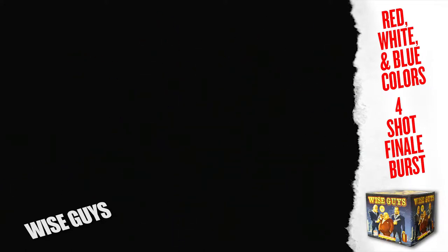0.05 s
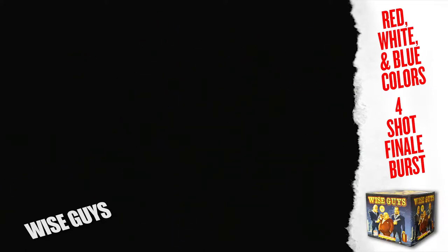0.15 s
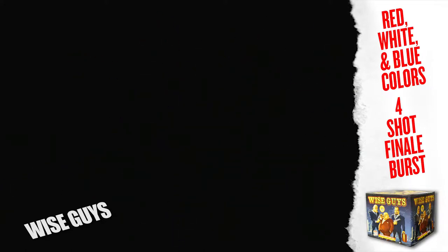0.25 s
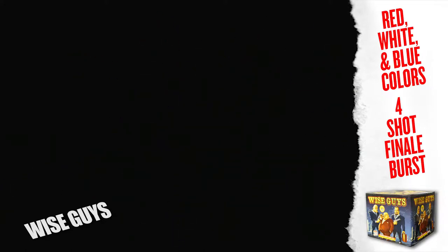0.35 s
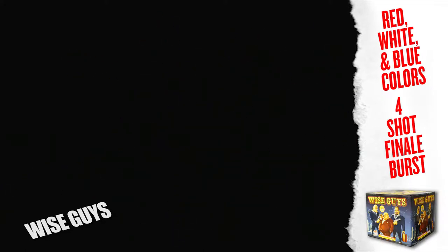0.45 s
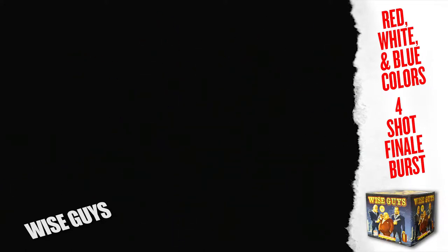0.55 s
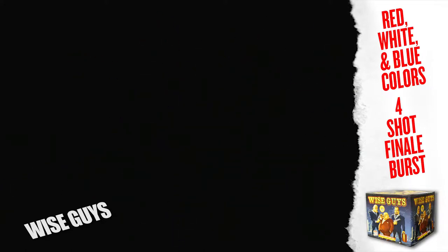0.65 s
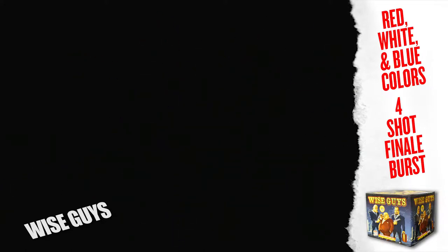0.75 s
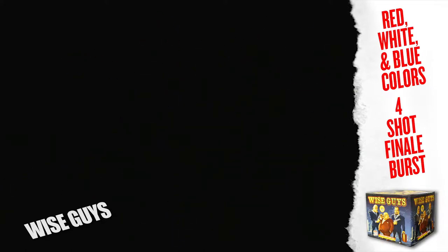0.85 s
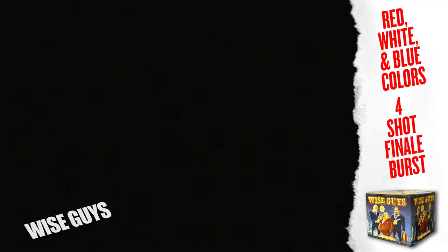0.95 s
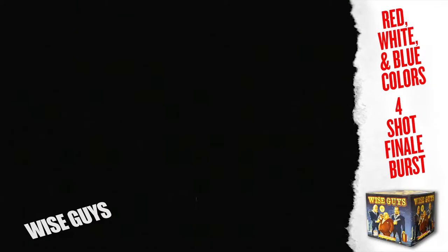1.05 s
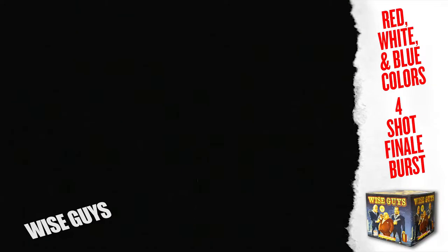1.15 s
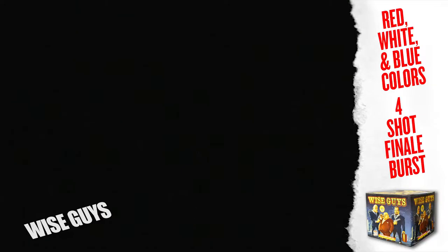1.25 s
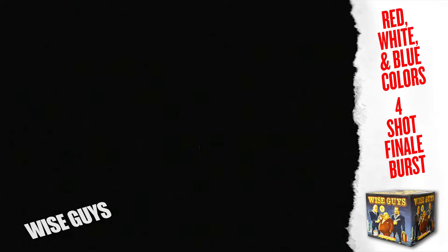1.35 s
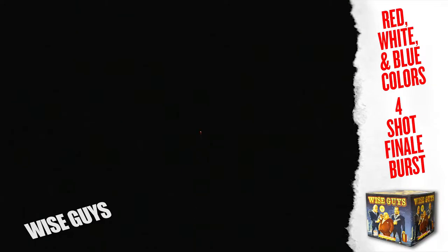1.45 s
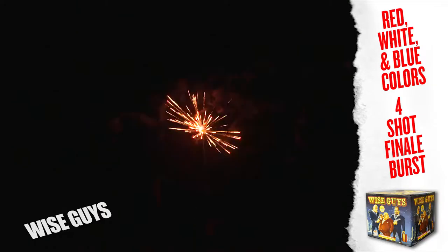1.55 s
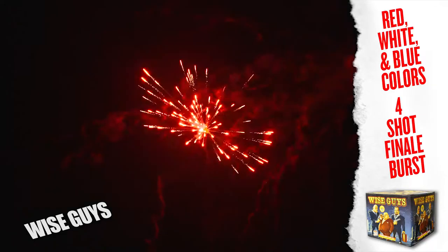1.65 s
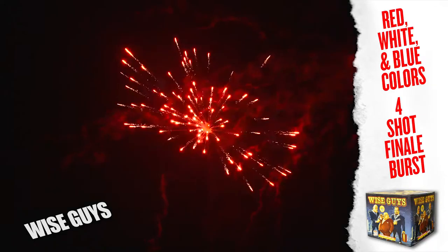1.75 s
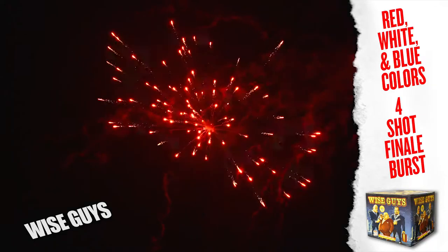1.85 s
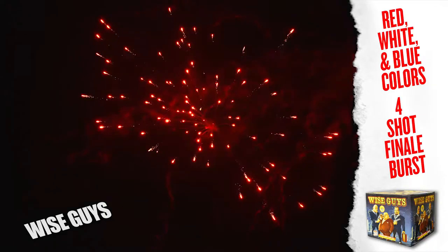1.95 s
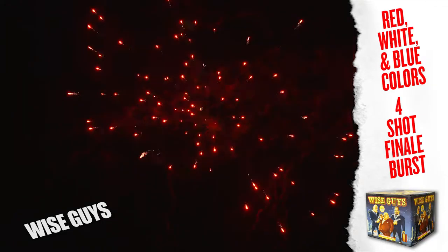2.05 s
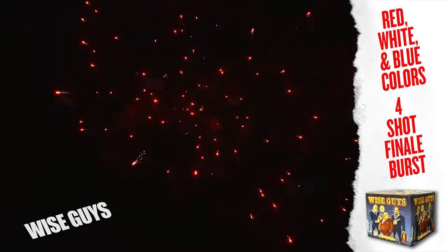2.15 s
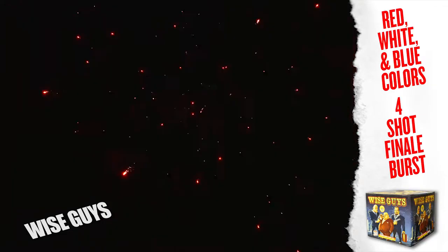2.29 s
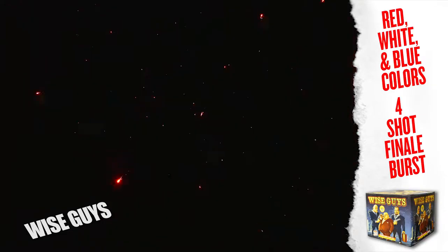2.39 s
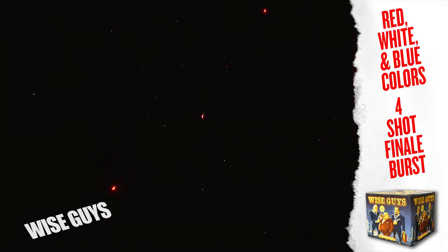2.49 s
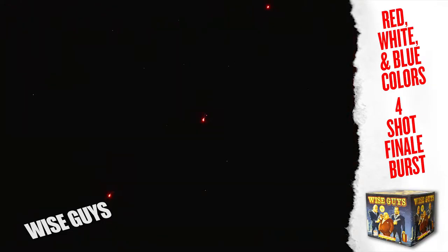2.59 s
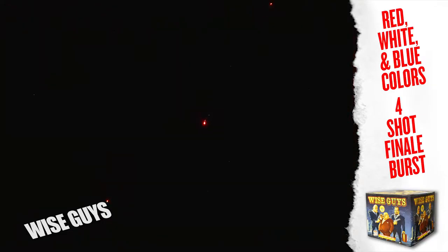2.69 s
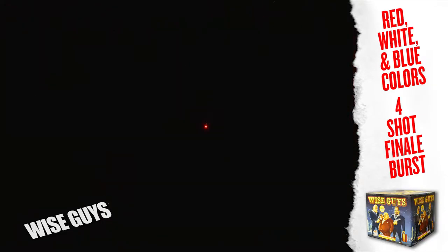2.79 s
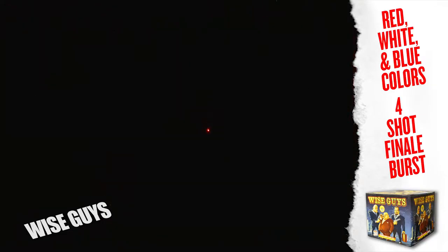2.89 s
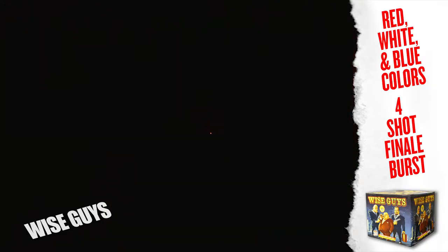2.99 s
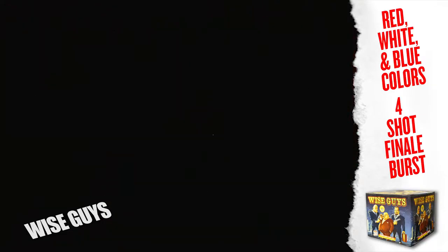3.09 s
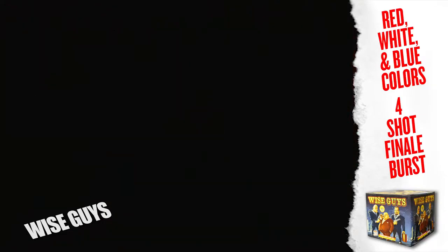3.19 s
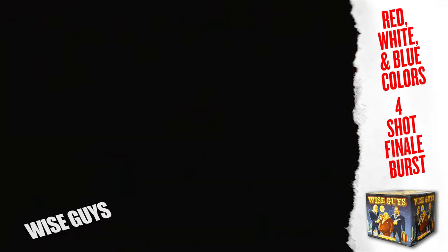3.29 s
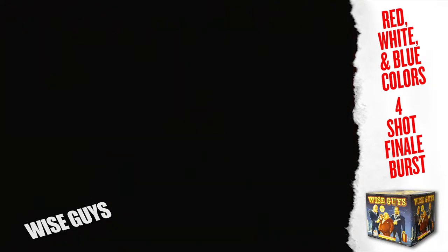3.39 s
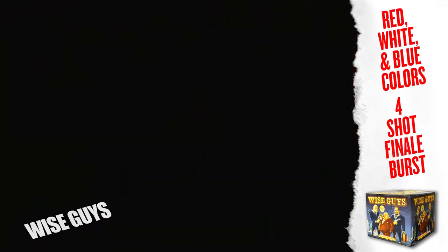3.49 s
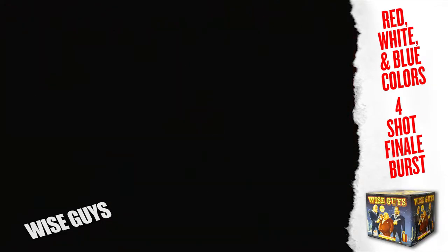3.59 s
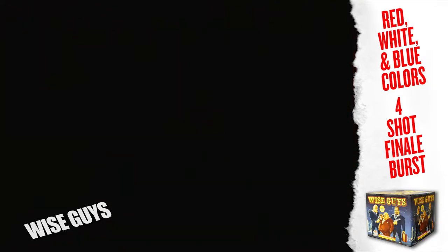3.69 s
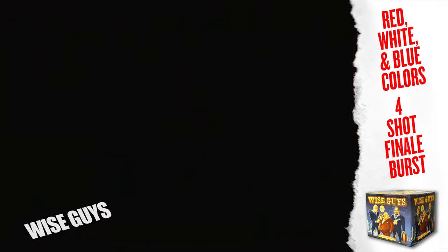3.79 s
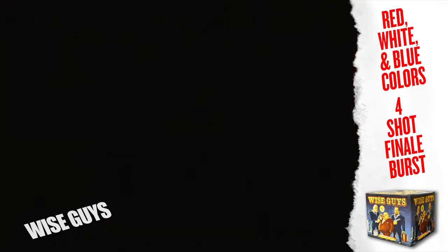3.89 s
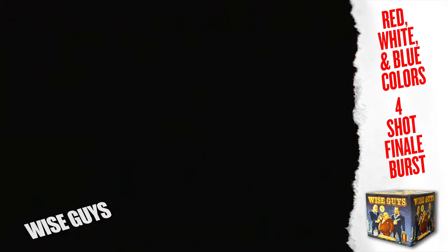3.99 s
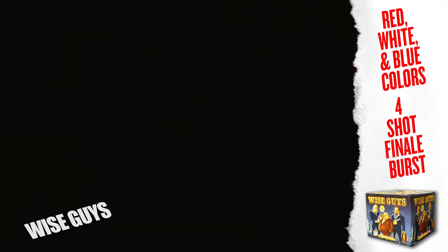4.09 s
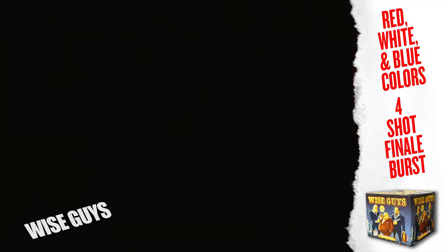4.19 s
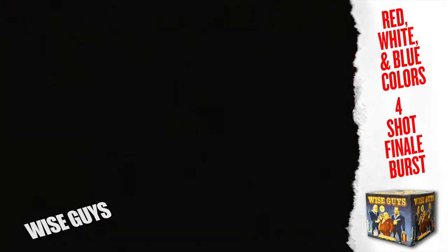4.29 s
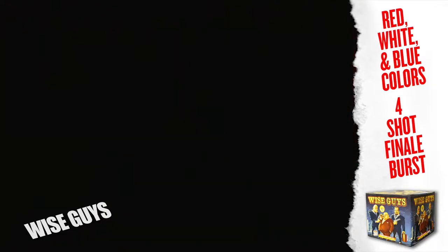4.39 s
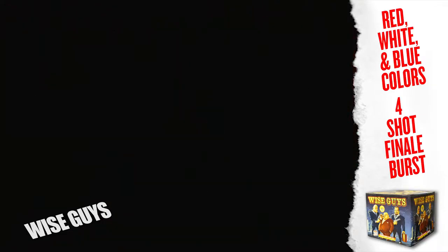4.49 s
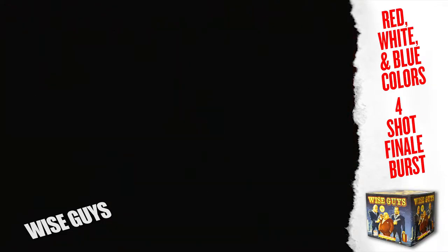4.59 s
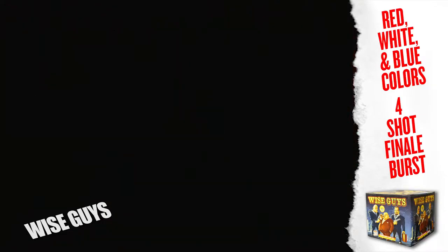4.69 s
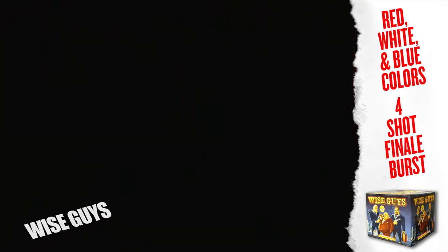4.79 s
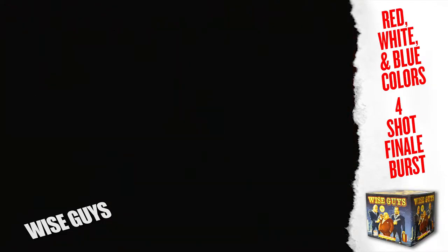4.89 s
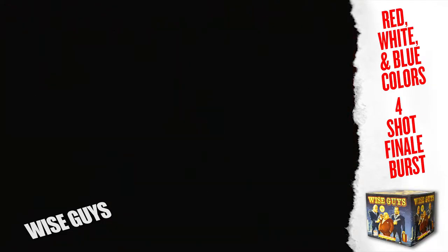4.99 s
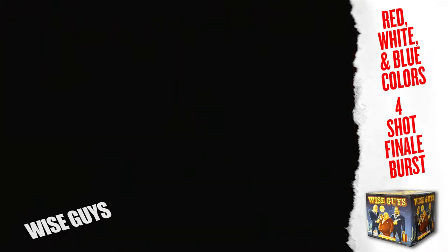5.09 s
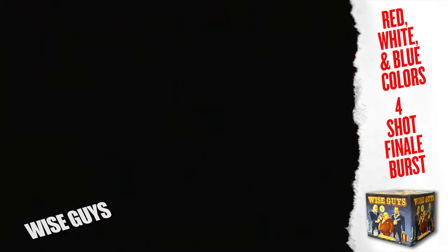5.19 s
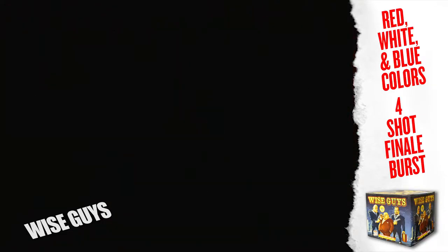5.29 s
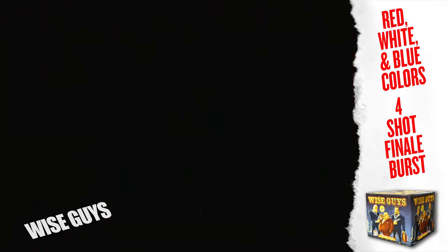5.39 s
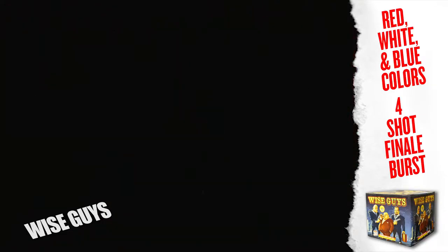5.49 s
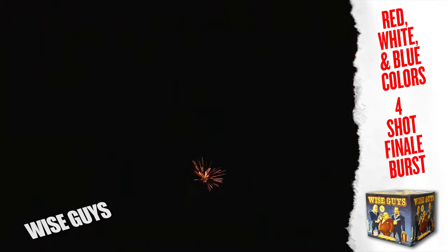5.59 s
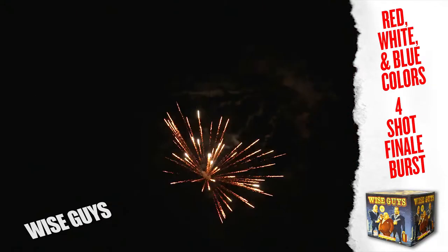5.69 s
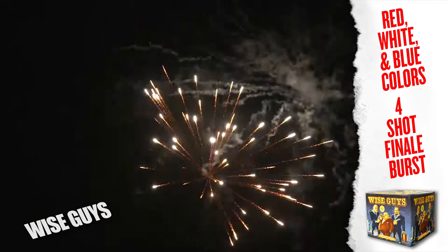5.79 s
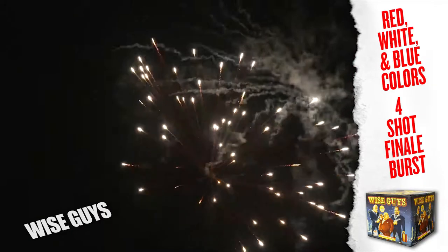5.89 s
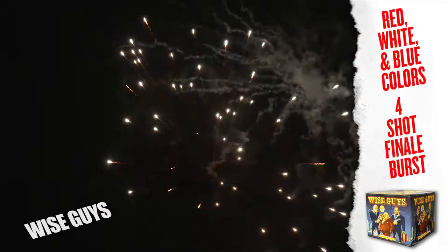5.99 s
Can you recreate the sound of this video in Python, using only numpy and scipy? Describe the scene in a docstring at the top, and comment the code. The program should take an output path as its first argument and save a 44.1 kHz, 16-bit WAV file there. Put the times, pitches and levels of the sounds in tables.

```python
"""A firework cake fires two shells at night, over a light rumble of wind. At 0.45 s the first leaves
its cardboard tube with a ringing thump and climbs on a faintly hissing fuse. At 1.8 s it bursts
overhead, hard enough to overload the microphone; nearby walls slap back, the stars fizz out and the
land rolls on for seconds. A fuse then spits its way to the second tube, which fires at 4.9 s,
and that shell bursts at 5.9 s."""
import sys
import numpy as np
from scipy import signal
from scipy.fft import rfft, irfft, next_fast_len
from scipy.io import wavfile

SR = 44100
rng = np.random.default_rng(int(sys.argv[2]) if len(sys.argv) > 2 else 0)


def pcm_store(signal):
    """Save signal as 16-bit PCM."""
    levels = np.round(np.clip(np.atleast_2d(signal), -1, 1) * 32767)
    wavfile.write(sys.argv[1], SR, levels.astype(np.int16).T)


N = 266805
T = np.arange(N) / SR


# the big hits overhead: t/s, level/dB, ground bounce lag/s, bounce gain/dB, roll gain/dB
BURSTS = [(1.8070, 5.5, 0.0049, 6, -1), (5.9035, 10.5, 0.0046, 0, 0.5)]
# hard slapback off single walls: t/s, level/dB, low-pass f/Hz
BURST_SLAPS = [(1.8147, 2.5, 805), (1.8247, 1.5, 700), (1.8261, -3, 600), (1.853, 2, 300), (1.864, -1, 450),
               (1.871, -4.5, 2210), (1.9002, -18, 3130), (1.923, -2, 179), (1.941, -1.5, 445),
               (1.964, -8.5, 800), (1.974, 2.5, 200), (2.035, 0.5, 236), (2.096, -8, 230),
               (2.739, -19.5, 454), (2.775, -22, 250), (2.961, -16, 239), (5.9098, 0.5, 607),
               (5.9193, -2.5, 500), (5.9249, -7.5, 890), (5.932, -7, 2520), (5.9596, -2.5, 1700),
               (5.9643, -1.5, 700), (5.993, -17, 1600), (6.008, -0.5, 447)]
# body of the boom rolling over the land: f/Hz, starting level/dB per octave
BURST_ROLL = [(25, -70.5), (55, -46), (85, -51.5), (150, -27.5), (300, -28), (450, -28), (720, -20.5),
              (1200, -28.5), (1750, -26.5), (2473, -30.5), (4100, -33.5), (7060, -37.5), (11000, -53),
              (16000, -73)]
# soft returns from trees and far slopes: delay/s, level/dB, smear/s, f/Hz
BURST_SCATTER = [(0, -37.5, 0.023, 5880), (.003, -31, 0.008, 2403), (.01, -16.5, 0.028, 385),
                 (0.124, -29.5, 0.033, 420), (.15, -28, 0.014, 1160), (.27, -47, .03, 1400),
                 (.035, -22.5, .012, 560), (.005, -28, .04, 88), (.74, -41, .025, 300),
                 (.92, -40, 0.014, 600), (1.12, -50, 0.016, 230)]

def bursts():
    """A shock from above and its bounce off the ground, then slaps and a long roll."""
    blast = springy_highpass(shock(push_s=0.00037), hz=134, q=2.0)
    t = T[:len(blast)]
    # the steep front overloads the microphone: a sharp double spike, a hard ring and a brief fizz
    spikes = signal.unit_impulse(len(t)) - signal.unit_impulse(len(t), int(0.00026 * SR))
    crack = undb(-17.5) * butter(spikes, 2700, "highpass")
    ring = undb(-11.5) * np.sin(2 * np.pi * 2200 * t) * np.exp(-t / 0.00036)
    mic_recovery = undb(-17.5) * np.exp(-T / 0.067) * (1 - np.exp(-T / 0.0036))
    out = np.zeros(N)
    for s, db, bounce_s, bounce_db, roll_db in BURSTS:
        for lag, path_db in [(0, 0), (bounce_s, bounce_db)]:
            fizz = undb(-18) * puff(12000, len(t)) * np.exp(-t / 0.00074)
            add(out, s + lag - 0.0002, undb(db + path_db) * crack)
            add(out, s + lag, undb(db + path_db) * (blast + ring + fizz))
        add(out, s, mic_recovery)
        land = roll(BURST_ROLL, spread_s=0.28, power=1.641, build_s=0.0025, grain=0.4,
                    loss_db_per_s=3, air_db_per_s=9.5, air_hz=3400, size=4 * SR)
        echoes = terrain(clump(land)) + scatter(BURST_SCATTER, len(land)) + fence(len(land))
        add(out, s, undb(roll_db) * echoes)
    return out + slaps(blast, BURST_SLAPS, lowest_hz=80, size=N)


# lift charge thumps: t/s, level/dB, echo gain/dB
LAUNCHES = [(0.4499, -6, -6.5), (4.8696, -6, -6)]
# dull slapback off the walls: delay/s, level/dB, low-pass f/Hz
LAUNCH_SLAPS = [(0.0125, -16, 610), (0.0213, -14.5, 690), (0.0568, -16, 500), (.101, -22, 346),
                (0.1175, -17, 350), (0.122, -22, 340), (0.17, -12.5, 380), (0.192, -21, 320)]
# the thump's tail across the land: f/Hz, starting level/dB per octave
LAUNCH_ROLL = [(30, -66.5), (71, -59.5), (129, -33), (198, -26.5), (320, -36.5), (440, -42), (720, -32.5),
               (1045, -36.5), (1600, -36), (2520, -39.5), (5000, -45.5), (8000, -55.5), (12000, -55)]
# airy returns from trees and hedges: delay/s, level/dB, smear/s, f/Hz
LAUNCH_SCATTER = [(.012, -25.5, 0.008, 2400), (.011, -36, 0.004, 5000), (.048, -39, 0.0047, 2710),
                  (.125, -35, 0.0066, 1190), (.143, -40, 0.0022, 1880), (.166, -30.5, 0.0031, 800),
                  (.186, -48.5, 0.0033, 3950)]

def launches():
    """The lift charge thumps out of the tube; both shots share one place and so one set of echoes."""
    thump = springy_highpass(shock(push_s=0.0035), hz=163, q=1.59)
    t = T[:len(thump)]
    thump = thump + 0.46 * np.pad(thump, (int(0.00042 * SR), 0))[:len(t)]  # ground bounce
    thump = butter(thump, 6000, "lowpass", order=1)
    thump = signal.lfilter(*signal.iirnotch(653, Q=3.2, fs=SR), thump)  # soft ground cancels one band
    land = roll(LAUNCH_ROLL, spread_s=0.22, power=2.037, build_s=0.006, grain=0.54,
                loss_db_per_s=6, air_db_per_s=30.5, air_hz=2250, size=3 * SR)
    walls = far_wall(len(land)) + slaps(thump, LAUNCH_SLAPS, lowest_hz=170, size=len(land))
    echoes = terrain(land) + walls + scatter(LAUNCH_SCATTER, len(land))
    echoes = butter(echoes, 8000, "lowpass", order=3)
    ignition_s = 0.0038  # the charge sounds through the tube wall just before the shell leaves
    out = np.zeros(N)
    for s, db, echo_db in LAUNCHES:
        ignition = butter(puff(2300, len(t)), 4000, "lowpass") * np.exp(-t / ignition_s)
        muzzle_crack = undb(-13) * puff(3770, len(t)) * np.exp(-t / 0.00041)
        add(out, s - ignition_s, undb(db - 38) * ignition)
        add(out, s, undb(db) * (thump + muzzle_crack + tube_ring(t) + tube_buzz(t)))
        add(out, s, undb(echo_db) * echoes)
    return out


# hollow ring, air column first and then cardboard: f/Hz, level/dB, attack/s, decay/s
TUBE_MODES = [(243, -13, 0.001, 0.023), (469, -13, 0.00011, 0.0041), (2850, -25, .0001, .0022),
              (4580, -25.5, .0001, 0.0016)]

def tube_ring(t):
    """The tube rings on after the shell has left."""
    return sum(undb(db) * np.sin(2 * np.pi * hz * t) * (1 - np.exp(-t / attack)) * np.exp(-t / decay)
               for hz, db, attack, decay in TUBE_MODES)


# cardboard rasp: f/Hz, width/Hz, level/dB
TUBE_BUZZ = [(2080, 300, -35), (2460, 230, -34), (3020, 360, -41.5)]

def tube_buzz(t, swell_s=0.021):
    """Escaping gas shakes the tube's narrow resonances, differently on each shot."""
    rasp = sum(undb(db) * noise_band(hz - width / 2, hz + width / 2, len(t))
               for hz, width, db in TUBE_BUZZ)
    return rasp * t / swell_s * np.exp(-t / swell_s)


def slaps(wave, walls, lowest_hz, size):
    """Each wall returns a dulled copy of the wave, without its longest wavelengths."""
    out = np.zeros(size)
    for s, db, hz in walls:
        add(out, s, undb(db) * butter(butter(wave, hz, "lowpass"), lowest_hz, "highpass"))
    return out


def roll(spectrum, spread_s, power, build_s, grain, loss_db_per_s, air_db_per_s, air_hz, size):
    """Countless small echoes thin out with distance; air, ground and gaps each drain their own band."""
    t = T[:size]
    echoes = unit(rng.standard_normal(size) * np.exp(grain * rng.standard_normal(size)))
    envelope = (1 - np.exp(-t / build_s)) * (1 + t / spread_s) ** -power
    envelope *= undb(0.7 * drift(70, size))
    hz, start_db = np.transpose(spectrum)
    # losses in dB/s
    air = air_db_per_s / (1 + (air_hz / hz) ** 3)
    ground = 5 * np.exp(-(np.log2(hz / 645) / 0.5) ** 2)  # soft ground soaks up the mids
    gaps = 13.5 / (1 + (hz / 117) ** 6)  # long waves slip past trees and houses
    table = np.column_stack([hz, start_db, loss_db_per_s + air + ground + gaps])
    return envelope * sum(band * undb(db - loss * t) for band, db, loss in bands(echoes, table))


def clump(x, fade_s=0.2):
    """Low echoes come back in clumps at first; the treble and the late tail stay smooth."""
    lows = signal.sosfiltfilt(signal.butter(2, 1200, fs=SR, output="sos"), x)
    depth_db = -3.5 * np.exp(-T[:len(x)] / fade_s)
    return x + lows * (undb(depth_db * drift(55, len(x))) - 1)


# the far land's EQ on the roll: f/Hz, width/Hz, gain/dB
LAND_COLOUR = [(470, 200, -1.5), (830, 160, -3), (1050, 130, 2.5), (1330, 260, 0), (1710, 120, 3),
               (1870, 140, 0.5), (2660, 200, 0)]

def terrain(x):
    """The mids sag over the open field until the tree line answers; the far land tints the roll."""
    mids = signal.sosfiltfilt(signal.butter(2, [400, 3200], "bandpass", fs=SR, output="sos"), x)
    dip_db = -6.5 * swell(s=0.068, half_s=0.055)[:len(x)]
    return colour(x + mids * (undb(dip_db) - 1), LAND_COLOUR)


def scatter(trees, size):
    """Trees smear a bang into soft swells of noise."""
    out, t = np.zeros(size), T[:SR // 2]
    for delay, db, smear_s, hz in trees:
        add(out, delay, undb(db) * puff(hz, len(t)) * t / smear_s * np.exp(-t / smear_s))
    return out


# sinking tone in the tail of a burst: delay/s, f/Hz, level/dB
FENCE_TONE = [(.4, 783, -62), (.5, 743, -40), (.62, 724, -52), (.95, 712, -56.5), (1.35, 705, -79)]

def fence(size, flutter_per_s=85):
    """Echoes off evenly spaced slats, perhaps a far fence, merge into a fluttering tone."""
    delay, hz, db = np.transpose(FENCE_TONE)
    t = T[:size]
    phase = 2 * np.pi * np.cumsum(np.interp(t, delay, hz)) / SR
    tone = drift(flutter_per_s, size) * np.sin(phase) + drift(flutter_per_s, size) * np.cos(phase)
    return tone * np.interp(t, delay, undb(db), left=0, right=0)


def far_wall(size, delay_s=0.3158, hz=1800):
    """A small far surface returns only the crack of a launch, as one dry tick."""
    out = np.zeros(size)
    tick = butter(signal.unit_impulse(SR // 16), [hz / 1.4, hz * 1.4], "bandpass")
    add(out, delay_s, undb(-31) * tick / np.abs(tick).max())
    return out


# dry ticks and pops: t/s, level/dB, f/Hz, width/octaves
SNAPS = [(.056, -55, 6400, 0.6), (0.07, -61, 6300, .7), (.192, -57, 750, 1.6), (.255, -57, 800, 1.4),
         (.38, -52, 600, 1.6), (1.085, -54, 5400, .8), (1.3296, -44.5, 3900, 1.6), (1.7505, -46, 3920, 2.0),
         (4.188, -62, 6000, 1.2), (4.37, -62.5, 6000, 0.94), (4.412, -67, 5500, 1.3),
         (4.535, -57.5, 4540, .6), (4.567, -40.5, 940, 1.8), (4.583, -60, 4500, 2.4), (4.84, -44, 786, 2),
         (5.04, -51, 6200, .5), (5.795, -48.5, 1280, 1.1)]

def snaps():
    """Faint dry ticks and pops; the one at 5.04 s is the bright edge of a launch echo."""
    out, t = np.zeros(N), T[:SR // 8]
    for s, db, hz, octaves in SNAPS:
        edges = [hz / 2 ** (octaves / 2), hz * 2 ** (octaves / 2)]
        tick = butter(signal.unit_impulse(len(t)), edges, "bandpass", order=3)
        tail = 0.4 * noise_band(*edges, len(t), order=3) * np.exp(-t / 0.0028)
        add(out, s, undb(db) * butter(tick / np.abs(tick).max() + tail, 2 * hz, "lowpass", order=1))
    return out


# thin sizzle of the climb: f/Hz, level/dB per octave
TIME_FUSE = [(600, -88.5), (1500, -84.5), (3000, -82.5), (5500, -70.5), (8000, -85)]

def time_fuses():
    """The time fuse sputters while each shell climbs, fading in and then thinning with height."""
    burning = sum(np.interp(T, [launch[0], launch[0] + 0.55, burst[0]], [0, 1, 0.55], left=0, right=0)
                  for launch, burst in zip(LAUNCHES, BURSTS))
    sputter = undb(2 * drift(22, N))
    return burning * sputter * butter(hiss(TIME_FUSE, flicker_db=1), 7500, "lowpass", order=4)


LINK_BURN_S = 0.61
LINK_LIT_S = LAUNCHES[1][0] - LINK_BURN_S
# thin spitting and a rustle muffled by cardboard: f/Hz near the band's top, level/dB, sputter/dB
LINK_FUSE = [(5460, -89, 2.5), (1170, -63, 1.2)]

def link_fuse():
    """Inside the cake a fuse burns towards the second tube, growing louder as it nears."""
    nearness = np.interp(T, [LINK_LIT_S, LINK_LIT_S + LINK_BURN_S], [0, 1], right=0) ** 0.5
    return nearness * sum(noise_band(hz / 2.26, hz * 1.08, N) * undb(db + sputter_db * drift(34, N))
                          for hz, db, sputter_db in LINK_FUSE)


def sparks():
    """The fuses spit tiny sparks at random, between the tubes and while a shell climbs."""
    out, t = np.zeros(N), T[:SR // 16]

    def spit(lit_s, burn_s, per_s, hz, db):
        for when, strength in rng.random((int(per_s * burn_s), 2)):
            spark = puff(hz, len(t)) * np.exp(-t / 0.0036)
            add(out, lit_s + when * burn_s, undb(db + 7.1 * strength) * spark)

    spit(LINK_LIT_S, LINK_BURN_S, per_s=26, hz=5600, db=-77)
    for launch, burst in zip(LAUNCHES, BURSTS):
        spit(launch[0], burst[0] - launch[0], per_s=16, hz=3600, db=-76)
    return butter(out, 8500, "lowpass", order=4)


def stars(hz=10500, burn_s=0.9, fade_s=0.29):
    """The stars thrown out by each burst fizz thinly until they burn out."""
    alight = sum(np.interp(T - burst[0], [0, burn_s, burn_s + fade_s], [1, 0.5, 0], left=0)
                 for burst in BURSTS)
    return alight * noise_band(hz / 1.3, hz * 1.3, N) * undb(-70 + 1.5 * drift(36, N))


# last glints of sizzle: t/s, level/dB, half length/s
STAR_FLARES = [(2.729, -74, .035), (2.95, -73.5, .03), (3.26, -81, .045)]

def star_flares(hz=7850):
    """A few stars sizzle up once more as they die."""
    sizzle = noise_band(hz / 1.6, hz * 1.4, N, order=3) * undb(2 * drift(80, N))
    return sizzle * sum(undb(db) * swell(s, half_s) for s, db, half_s in STAR_FLARES)


# soft sub-bass gusts: t/s, level/dB, half length/s
GUSTS = [(0.238, -41, 0.44), (0.87, -48.5, 0.049), (1.616, -51.5, 0.19), (2.693, -51, 0.54),
         (3.6, -50, 0.14)]

def wind(fall_db_per_s=2):
    """A dying breeze with a few soft gusts buffets the microphone."""
    rumble = butter(butter(rng.standard_normal(N), 22, "lowpass"), 2.2, "highpass")
    breeze = undb(-51.5 - fall_db_per_s * T)
    gusts = sum(undb(db) * swell(s, half_s) for s, db, half_s in GUSTS)
    return unit(butter(rumble, 80, "lowpass")) * np.hypot(breeze, gusts)


# the ambience bed: f/Hz, level/dB per octave
NIGHT_AIR = [(30, -87.5), (110, -68), (220, -67), (380, -82), (520, -74), (700, -76), (1050, -70.5),
             (1700, -79), (2400, -82), (3100, -86), (4200, -87.5), (7000, -82)]

def night_air():
    """A quiet, wavering hush lies under everything."""
    return hiss(NIGHT_AIR, flicker_db=2)


def insects():
    """A faint, narrow, fluttering band, like far night insects."""
    return noise_band(2850, 3250, N) * undb(-85 + 2.9 * drift(23, N))


def shock(push_s):
    """Blast wave: a sudden rise, a short push, then a longer suction."""
    t = T[:SR // 8] / push_s
    return (1 - t) * np.exp(-t)


def hiss(spectrum, flicker_db):
    """Steady noise whose bands waver on their own; the air dulls its top."""
    noise = sum(band * undb(db + flicker_db * drift(4.6, N))
                for band, db in bands(rng.standard_normal(N), spectrum))
    return butter(noise, 11000, "lowpass", order=1)


def bands(x, table):
    """Split white x into overlapping half octaves; yield each with the table's values at its centre."""
    hz, *columns = np.transpose(table)
    size = next_fast_len(len(x))
    f = np.maximum(np.fft.rfftfreq(size, 1 / SR), 1)
    pink = rfft(x, size) * np.sqrt(SR / 2 / (f * np.log(2)))
    for centre in 25 * 2 ** (np.arange(20) / 2):
        share = np.maximum(1 - 2 * np.abs(np.log2(f / centre)), 0)
        values = [np.interp(np.log(centre), np.log(hz), column) for column in columns]
        yield irfft(pink * share, size)[:len(x)], *values


def noise_band(low_hz, high_hz, size, order=2):
    """Band-passed noise, rms 1."""
    return unit(butter(rng.standard_normal(size), [low_hz, high_hz], "bandpass", order))


def puff(hz, size):
    """Noise about two octaves wide, rms 1."""
    return noise_band(hz / 2, hz * 2, size)


def drift(per_s, size):
    """Random modulation with a spread near 1."""
    return np.interp(T[:size] * per_s, np.arange(512), rng.standard_normal(512))


def swell(s, half_s):
    """Bell-shaped envelope peaking at time s."""
    return np.exp(-((T - s) / half_s) ** 2)


def colour(x, resonances):
    """Peaking EQ: lift or sink a few bands."""
    for hz, width_hz, db in resonances:
        x = x + (undb(db) - 1) * signal.lfilter(*signal.iirpeak(hz, hz / width_hz, SR), x)
    return x


def springy_highpass(x, hz, q):
    """Resonant high-pass: a pressure step swings back and overshoots."""
    w = 2 * np.pi * hz
    return signal.lfilter(*signal.bilinear([1, 0, 0], [1, w / q, w * w], SR), x)


def butter(x, hz, kind, order=2):
    """Plain low-, high- or band-pass."""
    return signal.sosfilt(signal.butter(order, np.minimum(hz, SR / 2 - 1), kind, fs=SR, output="sos"), x)


def undb(db):
    """Decibels to gain."""
    return 10 ** (np.asarray(db) / 20)


def unit(x):
    """Scale to rms 1."""
    return x / np.std(x)


def add(out, s, x):
    """Mix x into out from time s on."""
    i = max(int(round(s * SR)), 0)
    part = x[:max(N - i, 0)]
    out[i:i + len(part)] += part


def scene():
    """Shots, fuses and the night around them, mixed to mono."""
    mix = launches() + bursts() + stars() + time_fuses() + snaps() + wind() + night_air()
    mix += link_fuse() + insects() + sparks() + star_flares()
    return mix[None]


# tone of the microphone's housing: f/Hz, width/Hz, gain/dB
HOUSING = [(813, 200, -2.5), (2287, 98, 3), (2860, 590, 1.5), (3850, 410, 0.5), (7500, 7300, -2)]

def record(dry):
    """The housing colours the sound, the microphone clips unevenly, the recorder cuts the top."""
    clipped = np.clip(colour(dry, HOUSING), -0.41, 0.56)
    centred = butter(clipped, 1.1, "highpass", order=1)
    return signal.sosfilt(signal.ellip(8, 0.2, 70, 16500, fs=SR, output="sos"), centred)


dry = scene()
out = record(dry)
pcm_store(out)
```